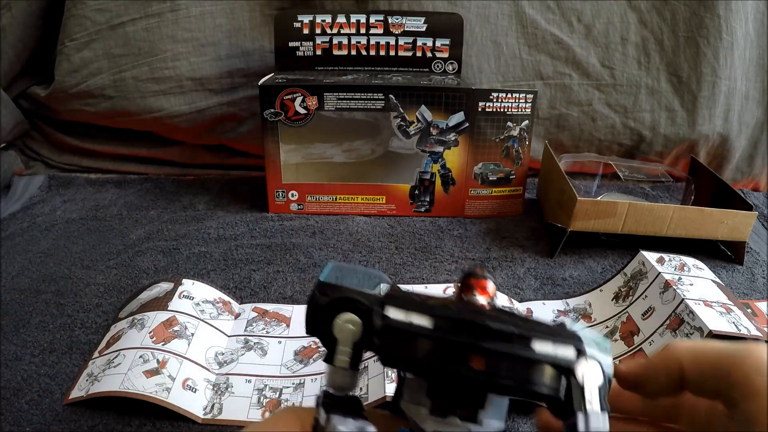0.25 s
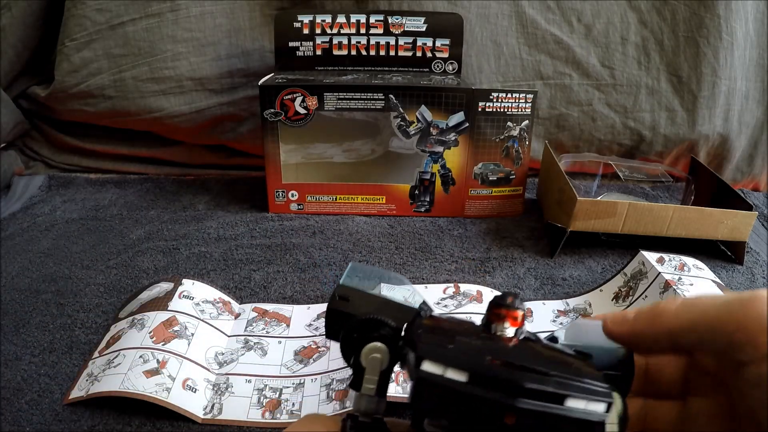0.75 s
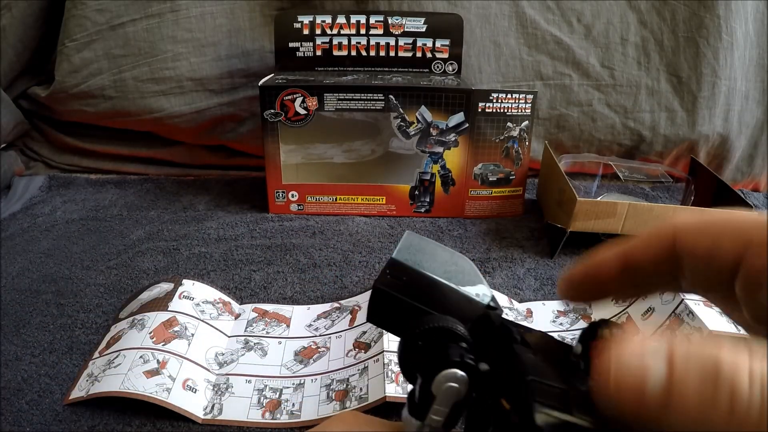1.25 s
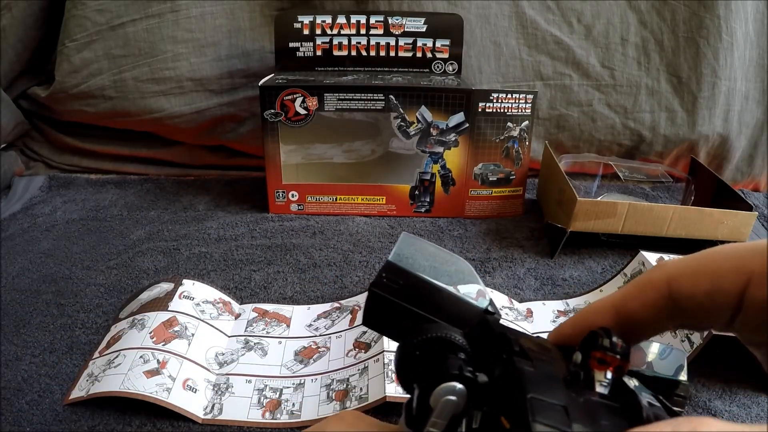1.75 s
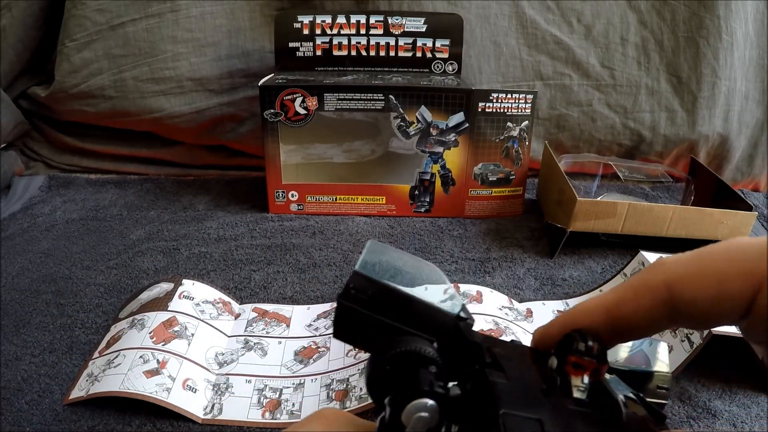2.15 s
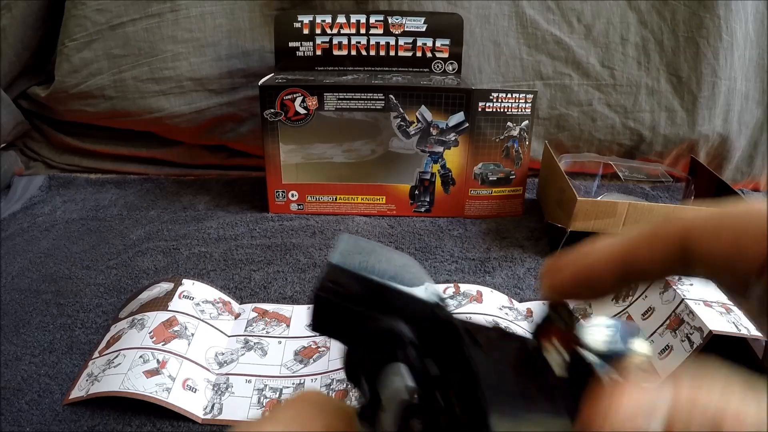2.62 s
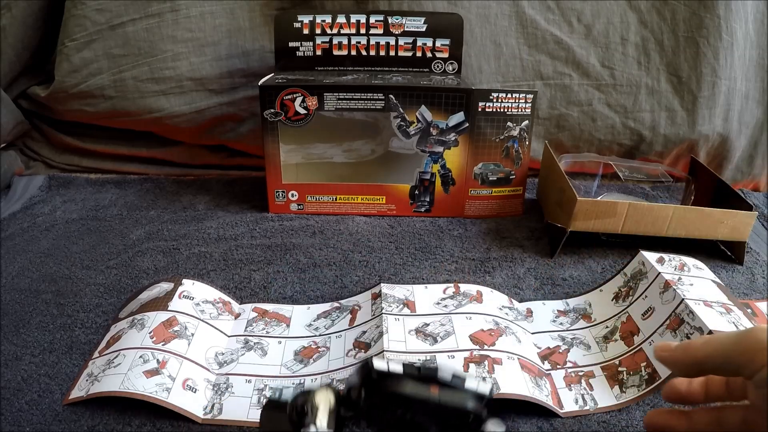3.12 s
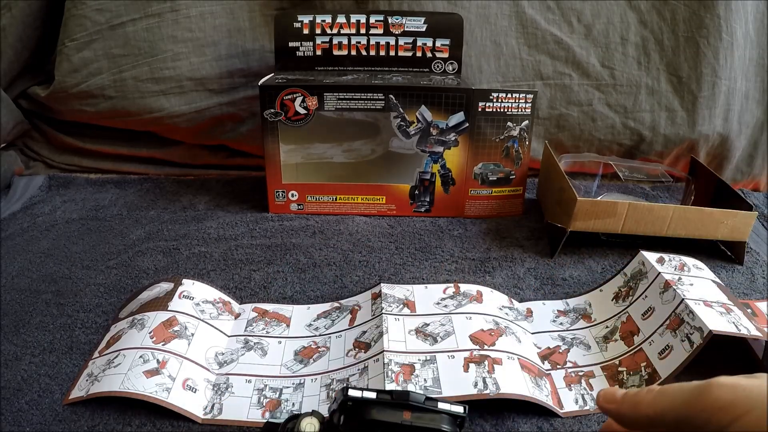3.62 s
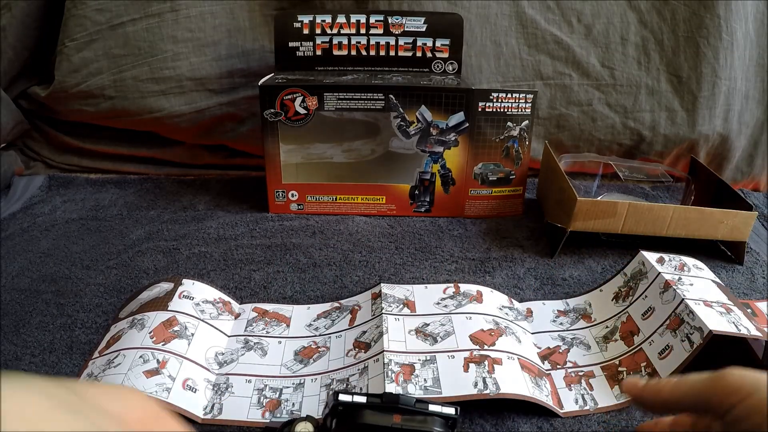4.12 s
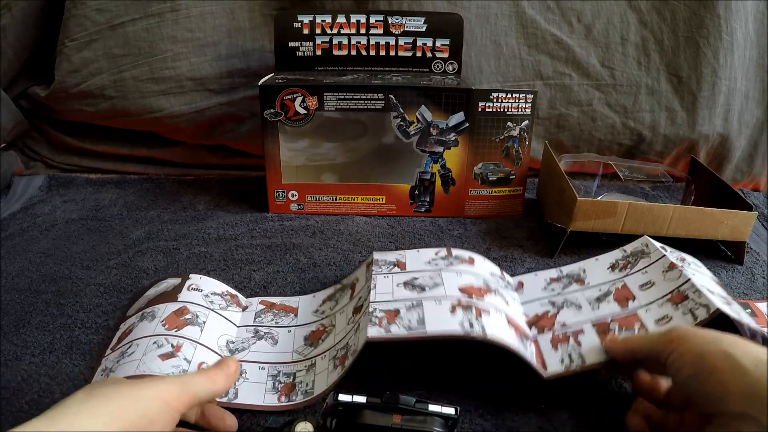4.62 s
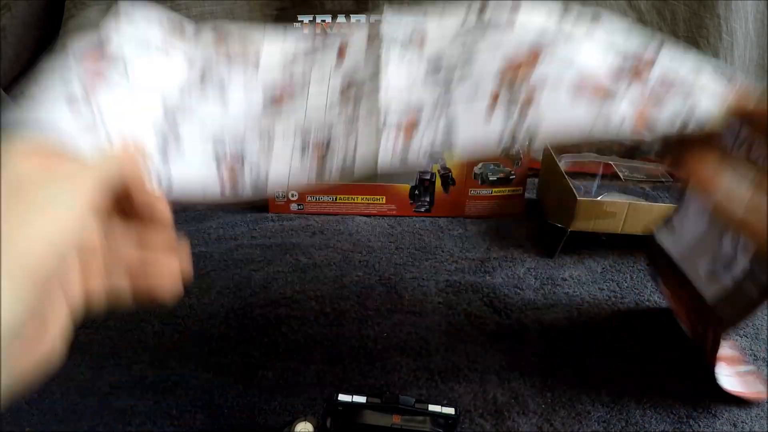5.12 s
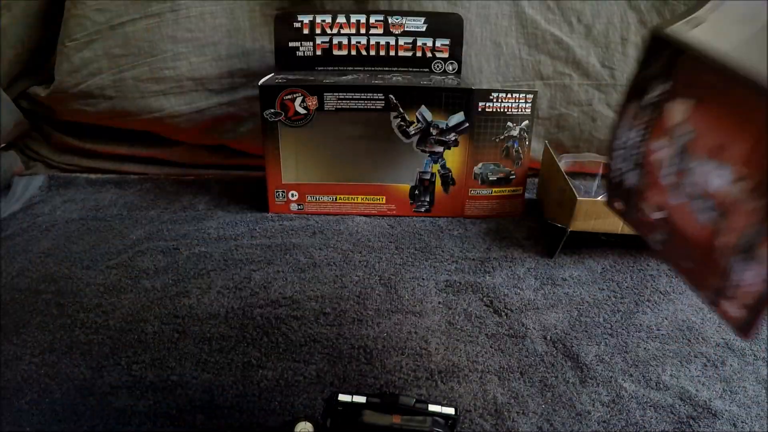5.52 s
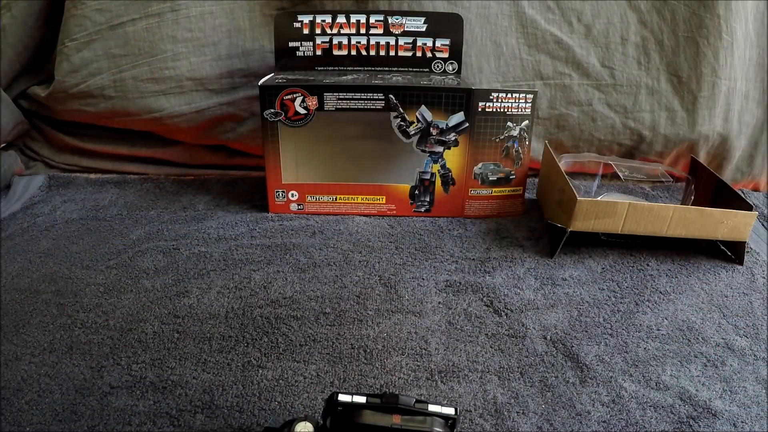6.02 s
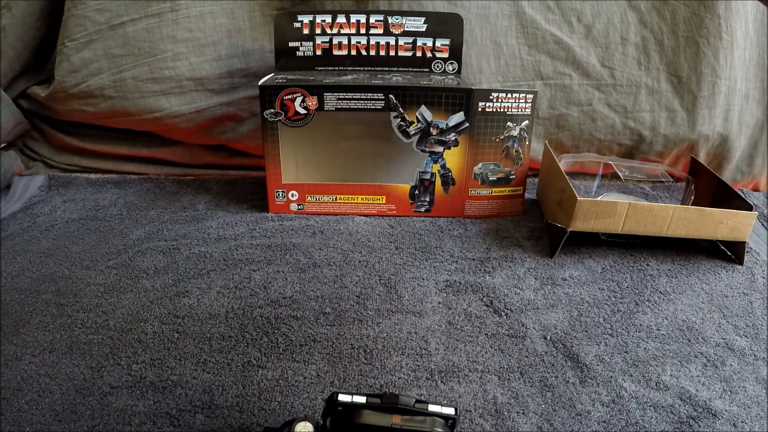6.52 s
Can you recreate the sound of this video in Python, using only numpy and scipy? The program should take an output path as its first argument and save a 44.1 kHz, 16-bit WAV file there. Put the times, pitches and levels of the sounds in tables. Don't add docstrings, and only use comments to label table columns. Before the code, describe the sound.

Close handling of a jointed plastic figure: one hard snap, a softer one, small knocks and ticks, a paper flap, then quiet hiss.

```python
import sys
import numpy as np
from scipy import signal
from scipy.fft import rfft, irfft
from scipy.io import wavfile
from scipy.ndimage import uniform_filter1d

SR = 44100
rng = np.random.default_rng(int(sys.argv[2]) if len(sys.argv) > 2 else 0)


def attenuation_scalar(level_db):
    decades = np.asarray(level_db, float) / 20
    return 10 ** decades


def wav_out(sig):
    wavfile.write(sys.argv[1], SR, np.round(np.clip(np.atleast_2d(sig).T, -1, 1) * 32767).astype(np.int16))


N = 298116
T = np.arange(N) / SR

# (time [s], level [dB], rise [s], fall [s])
LEANS = [
    (.19, -52, .06, 0.13),
    (.7, -55.5, 0.13, 0.35),
    (1.3, -55, 0.23, 0.53),
    (2.3, -50, 0.13, 0.35),
    (2.98, -53, 0.074, 0.16),
    (3.72, -52.5, 0.074, 0.12),
    (4.5, -59, 0.16, 0.34),
    (5.12, -55, 0.051, 0.14),
    (5.8, -50, 0.12, 0.12),
    (6.58, -62, .1, 0.13),
]
# (time [s], level [dB], rise [s], fall [s])
JOLTS = [
    (.2, -54.5, 0.074, 0.046),
    (.55, -51, 0.12, 0.055),
    (1.29, -49.5, 0.074, 0.059),
    (1.45, -48, 0.026, 0.11),
    (2.04, -53, 0.055, 0.064),
    (2.63, -51, 0.07, 0.1),
    (3.75, -58, .1, 0.9),
    (4.42, -55.5, 0.097, 0.092),
    (6.15, -59.5, 0.18, .06),
    (6.6, -56, 0.075, .06),
]
# (frequency [Hz], density [dB per Hz])
HISS_SPECTRUM = [(41, -39.5), (70, -4), (88, -11.5), (132, -13), (151, -18), (340, -25), (389, -21.5),
                 (416, -29.5), (639, -27), (838, -29), (1890, -32), (4660, -34.5), (15400, -43.5)]
# (frequency [Hz], level [dB])
WHINE_TONES = [(8619, -83), (11793, -92)]
# (time [s], level [dB], rise [s], fall [s])
SLIDES = [
    (.220, -70.5, 0.11, .08),
    (1.080, -65, 0.088, .14),
    (3.690, -83, .1, 0.17),
    (4.470, -70, 0.23, 0.11),
    (4.850, -71.5, 0.27, 0.18),
    (5.200, -71, 0.092, 0.076),
    (5.420, -75, 0.11, .15),
    (5.615, -69.5, .01, .03),
]
# (time [s], level [dB], rise [s], fall [s])
SLEEVE_DRAGS = [
    (.22, -74.5, 0.058, .079),
    (3.68, -81, 0.06, 0.09),
    (4.12, -79.5, 0.036, .06),
    (4.50, -80, 0.093, .05),
    (5.20, -81.5, 0.064, 0.07),
]
# (frequency [Hz], density [dB per Hz])
RUSTLE_SPECTRUM = [(590, -34.5), (1000, -5), (1260, -9), (1460, -9.5), (1700, -12.5), (2440, -6.5),
                   (3690, -11.5), (4390, -14), (4690, -10), (9000, -34), (11700, -44), (19800, -120)]
# (time [s], rub level [dB], rise [s], fall [s], skin rustle re rub [dB])
STROKES = [(.600, -73, .12, 0.089, -6), (.752, -65, 0.1, 0.067, -6.5), (.925, -65, 0.06, 0.068, -10),
           (1.135, -56, 0.053, 0.045, -12.5), (1.370, -55, 0.033, 0.057, -20.5),
           (1.445, -49, .025, 0.023, -23), (1.675, -55, 0.014, 0.1, -20), (1.788, -49, 0.078, 0.03, -41),
           (1.910, -59, 0.052, .025, -26), (2.020, -51, 0.024, 0.036, -14.5),
           (2.130, -62.5, 0.026, 0.09, -20), (2.345, -67.5, .01, 0.082, -10),
           (2.560, -56, 0.014, 0.061, -18), (3.272, -68.5, 0.015, .04, -4), (3.490, -65.5, .04, 0.1, -6.5),
           (3.635, -63.5, 0.022, 0.11, -10.5), (3.875, -64.5, 0.028, 0.076, -12.5),
           (4.020, -63, 0.051, 0.078, -15.5), (4.125, -54.5, 0.069, 0.068, -25),
           (4.265, -56.5, .012, 0.099, -28), (4.480, -64.5, 0.15, 0.1, -3.5), (4.720, -65, .07, 0.1, -8),
           (4.820, -66.5, 0.068, 0.15, -16), (4.980, -65.5, 0.13, 0.083, -5.5)]
# (frequency [Hz], t60 [s], level [dB])
GRIPPED_MODES = [(429, 0.09, -5), (481.3, 0.066, 2), (511.5, 0.061, 1), (644.3, 0.055, -10),
                 (785, 0.035, -10), (900, 0.025, -10), (1021, 0.09, -16.5), (1155, 0.037, -23.5),
                 (1321, 0.04, -19), (1760, 0.022, -23), (1800, 0.0507, -19), (2400, 0.014, -18),
                 (2690, .03, -25), (2840, 0.03003, -22.5), (3280, 0.029, -21.5)]
# (time [s], level [dB], rise [s], fall [s])
SCRAPES = [
    (1.428, -59, .004, 0.016),
    (2.582, -40.5, 0.0072, 0.006),
    (2.594, -48, 0.0057, .007),
    (4.560, -62, .004, 0.02),
    (5.028, -50.5, 0.0071, 0.024),
]
# (time [s], peak level [dB], contact [ms])
KNOCKS = [(1.439, -26, 0.69), (1.658, -39, 0.23), (1.693, -48, 0.72), (1.766, -50, 0.31), (2.009, -60, 1.2),
          (2.337, -41.5, 0.25), (2.533, -41, .5), (2.578, -31, 0.47), (2.588, -41, 0.29), (2.591, -19, .8),
          (4.097, -54, .85), (4.255, -36.5, 1.3), (4.553, -50, 0.31), (4.797, -49, 1), (4.933, -43, 0.52),
          (5.005, -34.5, 0.34)]
# (low edge [Hz], high edge [Hz], power share [1])
PAPER_SCUFF = (370, 667, 0.75)
# (start [s], end [s], start frequency [Hz], end frequency [Hz], level [dB])
SQUEAK = (.88, .975, 10800, 11300, -82)
# (time [s], level [dB], rise [s], fall [s])
PRESSES = [(.926, -67.5, .02, 0.017), (1.165, -69, 0.026, .02), (1.442, -57.5, 0.02, .015),
           (1.535, -65, .01, 0.031), (1.760, -66.5, .07, 0.051), (2.330, -67, .06, 0.049),
           (2.590, -66, .03, .03), (3.190, -64.5, .02, .02), (4.100, -69, 0.041, 0.05),
           (4.300, -64, .05, 0.15), (4.560, -65.5, .06, 0.046), (4.810, -57, 0.031, 0.017),
           (5.020, -54.5, 0.064, 0.075), (5.210, -68, 0.015, 0.063)]
# (time [s], blow [dB], contact [ms], rebound gap [ms], crack [dB])
SNAPS = [
    (1.2731, -13.5, 0.39, 5.1, -10),
    (1.5370, -32, 0.47, 4.1, -23),
]
SHELL_HZ = [300, 362, 432, 486, 530, 647, 754, 912, 1057, 1342, 1560, 1655, 1828, 2030, 2240, 2650, 3200,
            3390, 4330, 4900, 5520]
# (t60 [s], hard snap level [dB], soft snap level [dB])
SHELL_MODES = [(0.024, -7.5, -40), (0.066, -12, 1.5), (0.042, 3, 8.5), (.07, 3, -1.5), (0.067, -6.5, -1),
               (0.093, -1.5, -1), (0.07, -9.5, 2.5), (.045, -2.5, -3), (0.09, -21, -10.5),
               (0.071, -21, -31), (0.092, -31, -36), (0.065, -25, -32), (.1, -28.5, -29), (.04, -23, -23),
               (.028, -22.5, -44), (0.025, -12.5, -37), (.022, -16.5, -29), (0.022, -17, -29),
               (0.02, -18.5, -36), (0.014, -21.5, -38), (0.0061, -15.5, -30)]
# (time [s], peak level [dB], ring [Hz], second ring [Hz], t60 [s])
TICKS = [(1.695, -59, 2300, 3400, .015), (2.5962, -55, 3430, 2050, 0.027), (3.189, -68, 2200, 3000, .015),
         (3.2287, -56, 3360, 1600, 0.018), (3.231, -52, 2160, 6340, 0.023),
         (3.2458, -58, 3360, 1800, 0.012), (3.2481, -55, 3300, 2000, 0.013),
         (3.2500, -50.5, 6340, 5070, 0.028), (3.2542, -56, 2000, 3000, 0.01),
         (4.372, -50.5, 3580, 1100, 0.022), (4.916, -58, 4300, 2260, 0.012),
         (5.0173, -48.5, 4700, 5600, 0.01), (5.073, -64, 2900, 2400, 0.011),
         (5.6138, -60.5, 4700, 5860, 0.017)]
# (time [s], peak level [dB], ring [Hz], second ring [Hz], t60 [s])
SCUFFS = [
    (2.006, -58, 2800, 1350, 0.097),
    (2.022, -66, 4500, 3200, 0.011),
    (3.2298, -52.5, 5630, 3330, 0.012),
    (4.449, -60, 2400, 4300, 0.041),
    (4.553, -59.5, 1350, 2270, 0.022),
    (4.557, -60, 1060, 1484, 0.051),
    (4.789, -65, 4300, 3900, .008),
    (4.803, -60.5, 990, 990, 0.089),
    (5.0516, -58, 2980, 2170, 0.025),
]
# (time [s], level [dB], rise [s], fall [s])
FLAPS = [
    (5.0185, -39.5, 0.0023, 0.0097),
    (5.052, -54.5, 0.0024, 0.0079),
    (5.075, -68, 0.0034, 0.0099),
]
# (frequency [Hz], level [dB], t60 [s])
SHEET_MODES = [(242, 4, 0.059), (296, -16, 0.044), (403, 2, 0.036), (527, 2, 0.023), (1000, -4, 0.033),
               (1120, -5, 0.025), (1350, 4.5, 0.01), (2000, -4.5, 0.041), (2334, 1.5, 0.017),
               (2800, -0.5, 0.018), (3080, -3, 0.0097), (4080, -5.5, 0.011), (4700, -25, 0.011)]


def unit(x):
    return x / np.sqrt(np.mean(x ** 2))


def ring(x, hz, t60):
    pole = np.exp(2j * np.pi * hz / SR - np.log(1000) / (t60 * SR))
    return signal.lfilter([1], [1, -pole], x).imag


def band(x, lo_hz, hi_hz, order=2):
    return signal.sosfilt(signal.butter(order, [lo_hz, hi_hz], "band", fs=SR, output="sos"), x)


def colour(x, spectrum):
    hz, db = np.transpose(spectrum)
    f = np.fft.rfftfreq(N, 1 / SR) + 1
    gain_db = np.interp(np.log(f), np.log(hz), db, left=-90, right=-90)
    return unit(irfft(rfft(x) * attenuation_scalar(gain_db), N))


def walk(rate_hz):
    k = int(SR / rate_hz)
    steps = np.repeat(rng.standard_normal(N // k + 1), k)
    return unit(uniform_filter1d(uniform_filter1d(steps, k), k)[:N])


def grains(per_s, spread_db):
    happens = rng.random(N) < per_s / SR
    return happens * rng.standard_normal(N) * attenuation_scalar(spread_db * rng.exponential(size=N))


def push(start_s, db, ms, t):
    u = np.clip((t - start_s) / (ms / 1000), 0, 1)
    return attenuation_scalar(db) * np.sin(np.pi * u) ** 2 / (ms / 2000 * SR)


def add(out, s, sound):
    i = int(s * SR)
    out[i:i + len(sound)] += sound[:N - i]


def envelope(t, s, rise, fall):
    return np.exp(np.where(t < s, (t - s) / rise, (s - t) / fall))


def swell(bursts):
    return sum(attenuation_scalar(db) * envelope(T, s, rise, fall) for s, db, rise, fall in bursts)


def effort_db(bursts, rest_db):
    t = T[::32]
    power = sum(attenuation_scalar(2 * db) * envelope(t, s, rise, fall) ** 2 for s, db, rise, fall in bursts)
    eased = uniform_filter1d(power, int(0.02 / t[1]))
    return np.interp(T, t, 10 * np.log10(eased + attenuation_scalar(2 * rest_db)))


def background():
    deep = unit(band(rng.standard_normal(N), 15.2, 38.9)) * attenuation_scalar(effort_db(LEANS, -61))
    boom = unit(band(rng.standard_normal(N), 49, 67)) * attenuation_scalar(effort_db(JOLTS, -63))
    hiss = colour(rng.standard_normal(N), HISS_SPECTRUM) * attenuation_scalar(-67 + 0.21 * walk(6.4))
    hiss = hiss + band(hiss, 6756, 16000) * (0.09 * walk(30) + 0.028 * walk(9.9))
    frame_hz, slip_hz = 30, 21.3
    frame = (T * frame_hz) % 1
    gate = np.sin(np.pi * np.clip(frame / 0.6, 0, 1)) * attenuation_scalar(1.7 * walk(7.3))
    whine = np.zeros(N)
    for hz, db in WHINE_TONES:
        phase = 2 * np.pi * (hz * frame / frame_hz + slip_hz * T)
        whine += attenuation_scalar(db) * gate * np.sin(phase)
    return deep + boom + hiss + whine


def rustle(level_db):
    fibres = grains(6000, 1.5) * attenuation_scalar(1.1 * walk(23))
    swish = unit(band(fibres, 2400, 3100)) * swell(SLEEVE_DRAGS)
    return colour(fibres, RUSTLE_SPECTRUM) * attenuation_scalar(level_db) + swish


def gripped_shell(x, gain_db, damp):
    out = 0
    for k, ((hz, t60, db), gain) in enumerate(zip(GRIPPED_MODES, gain_db)):
        out = out + (-1) ** k * attenuation_scalar(db + gain) * ring(x, hz, damp * t60)
    return out


def handling(rub_db):
    slips = grains(8900, 0.87) * attenuation_scalar(2.0 * walk(30))
    octaves = np.log2(np.array(GRIPPED_MODES)[:, 0] / 500)
    rub = gripped_shell(slips, 0 * octaves, 0.86)
    lo_hz, hi_hz, share = PAPER_SCUFF
    paper = share * np.clip((T - 4.25) / 0.21, 0, 1)
    scuff = unit(band(slips, lo_hz, hi_hz, order=4))
    out = (np.sqrt(1 - paper) * unit(rub) + np.sqrt(paper) * scuff) * attenuation_scalar(rub_db)
    at_stop_db = 6.6 * np.exp(-((octaves - 0.85) / 0.08) ** 2)
    out += gripped_shell(slips * swell(SCRAPES), 0.97 * octaves + at_stop_db, 0.78) / np.std(rub)
    t = T[:SR // 6]
    for s, db, contact_ms in KNOCKS:
        spot_db = 3 * rng.standard_normal(len(GRIPPED_MODES))
        add(out, s, gripped_shell(push(0, db - 10.0, contact_ms, t), spot_db, 0.79))
    return band(out, 326, 8984, order=3)


def squeak():
    s0, s1, hz0, hz1, db = SQUEAK
    u = np.clip((T - s0) / (s1 - s0), 0, 1)
    hz = hz0 + (hz1 - hz0) * u + 60 * walk(150)
    return attenuation_scalar(db) * np.sin(np.pi * u) * np.sin(2 * np.pi * np.cumsum(hz) / SR)


def thud(level_db):
    return unit(band(rng.standard_normal(N), 120, 392)) * attenuation_scalar(level_db + 2.0 * walk(23))


def snaps():
    out, t = np.zeros(N), T[:SR // 3]
    bending_modes = 9
    for column, (s, db, contact_ms, gap_ms, crack_db) in enumerate(SNAPS):
        start = s - int(s * SR) / SR
        force = np.zeros(len(t))
        for k, lag in enumerate((0, 1, 2.6)):
            force += push(start + lag * gap_ms / 1000, db - 8 * k, (1 + k) * contact_ms, t)
        rattle = rng.standard_normal((len(SHELL_HZ), len(t))) * t * np.exp(-t / 0.00063)
        given = np.abs(np.sum(rattle * np.exp(-2j * np.pi * np.outer(SHELL_HZ, t)), axis=1))
        click = push(start + 0.0009, 0, 0.044, t)
        clatter = attenuation_scalar(crack_db) * (0.3 * rattle / given[:, None] + 0.74 * click)
        modes = np.zeros(len(t))
        for k, (hz, mode) in enumerate(zip(SHELL_HZ, SHELL_MODES)):
            drive = (-1) ** (k + 1) * force if k < bending_modes else clatter[k]
            modes += attenuation_scalar(mode[1 + column]) * ring(drive, hz, mode[0])
        fade = np.exp(-t / 0.00398) + 0.12 * np.exp(-t / 0.012)
        wash = band(rng.standard_normal(len(t)), 1100, 3480) * fade * np.minimum(t / 0.00089, 1)
        add(out, s, modes + attenuation_scalar(crack_db - 26) * wash)
    return band(out, 231.8, 9000)


def ticks():
    out, t = np.zeros(N), T[:SR // 12]
    for events, scratch_ms in ((TICKS, 0.98), (SCUFFS, 5.6)):
        for s, db, hz, hz2, t60 in events:
            scratch = rng.standard_normal(len(t)) * t * np.exp(-t / (scratch_ms / 3000))
            first, second = ring(scratch, hz, t60), ring(scratch, hz2, 0.8 * t60)
            crack = band(scratch, 0.6 * min(hz, hz2), 1.3 * max(hz, hz2))
            parts = sum(g * p / np.abs(p).max() for g, p in ((0.85, first), (0.65, second), (1.2, crack)))
            add(out, s, attenuation_scalar(db + 0.5) * parts)
    return band(out, 500, 7200, order=3)


def sheet():
    creases = unit(grains(16000, 0.95)) * swell(FLAPS)
    modes = np.zeros(N)
    for k, (hz, db, t60) in enumerate(SHEET_MODES):
        modes += (-1) ** k * attenuation_scalar(db) * ring(creases, hz, np.clip(t60, 0.008, 0.05))
    return 0.061 * modes + attenuation_scalar(-4.5) * band(creases, 900, 4500, order=1)


def room_tail(near):
    t, t60_s = T[:SR // 3], 0.12
    tail = band(rng.standard_normal(len(t)), 300, 3487, order=1)
    tail = tail * np.exp(-np.log(1000) * t / t60_s) * (t > 0.004)
    return attenuation_scalar(-22.5) * signal.fftconvolve(near, tail / np.sqrt(np.sum(tail ** 2)))[:N]


def scene():
    rub_db = effort_db([row[:4] for row in STROKES], -82.5)
    skin = [(s, db + skin_db, rise, fall) for s, db, rise, fall, skin_db in STROKES]
    toy = handling(rub_db) + snaps() + sheet()
    toy = signal.sosfilt(signal.cheby2(8, 40, 6549, fs=SR, output="sos"), toy)
    friction = rustle(effort_db(skin + SLIDES, -85))
    pressing = thud(effort_db(PRESSES, -76.5))
    near = toy + ticks() + friction + pressing
    return (near + room_tail(near) + squeak() + background())[None]


def band_limit(x):
    return signal.sosfilt(signal.butter(12, 15580, fs=SR, output="sos"), x)


def record(dry):
    return band_limit(dry)


dry = scene()
out = record(dry)
wav_out(out)
```